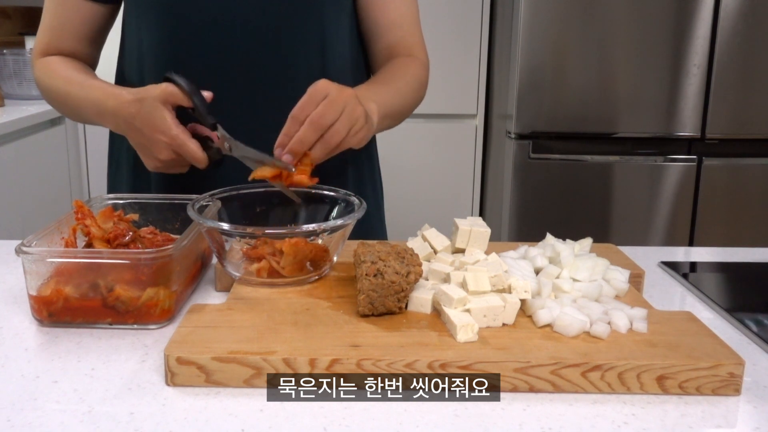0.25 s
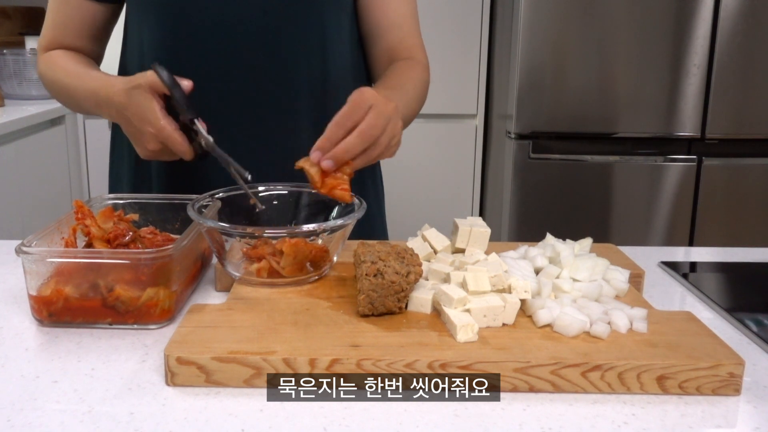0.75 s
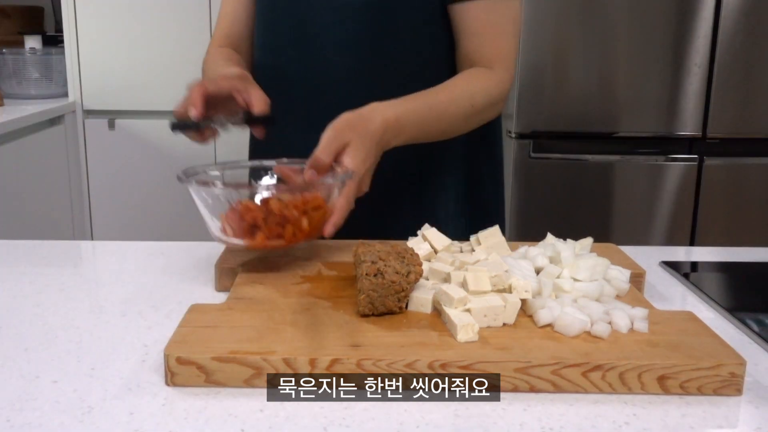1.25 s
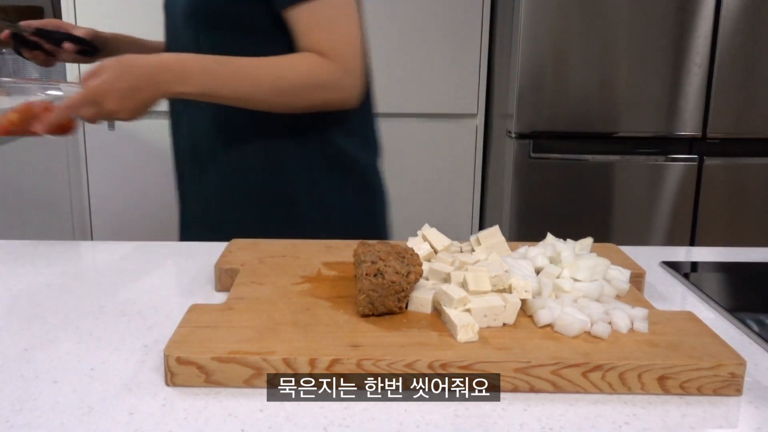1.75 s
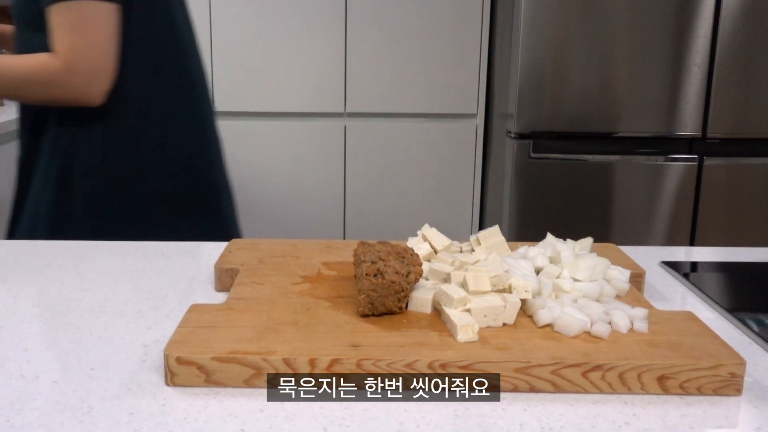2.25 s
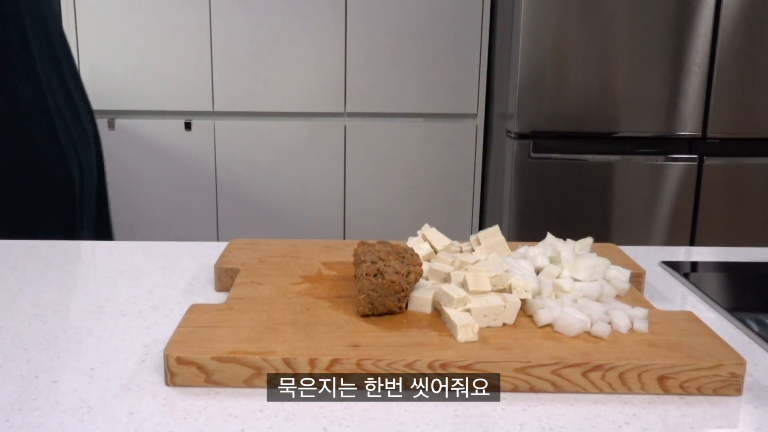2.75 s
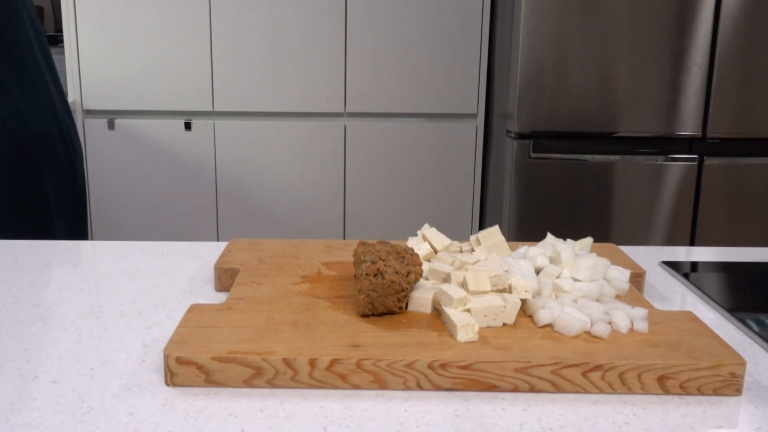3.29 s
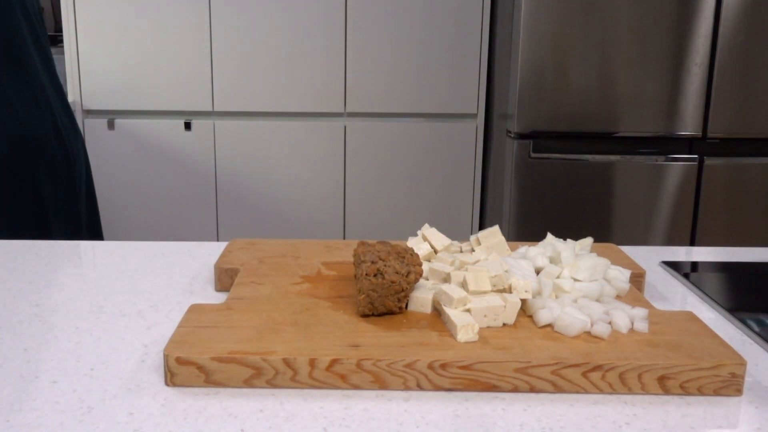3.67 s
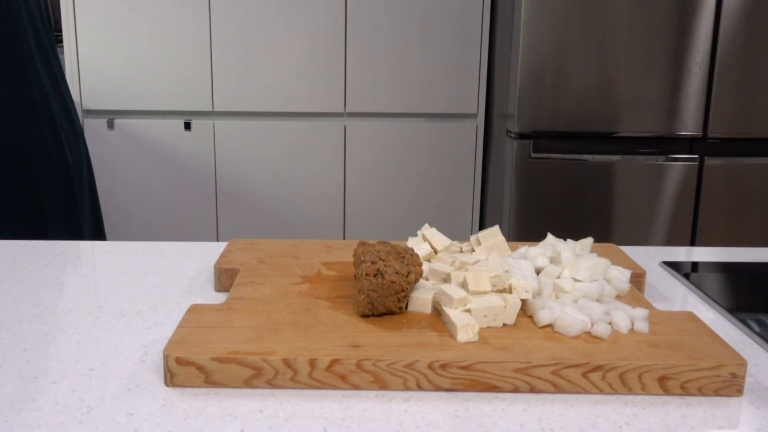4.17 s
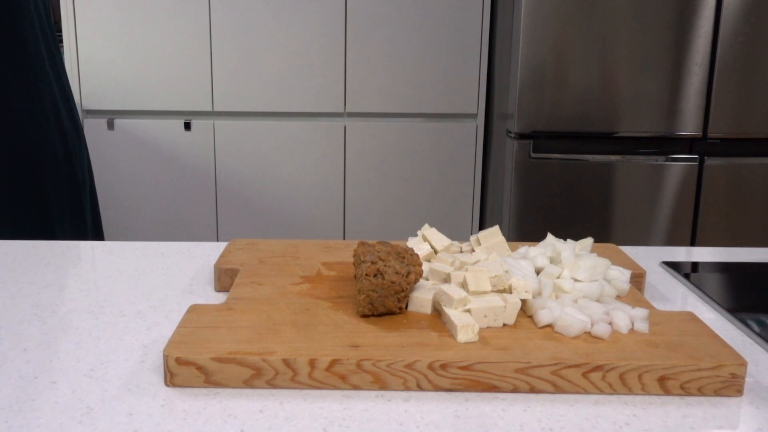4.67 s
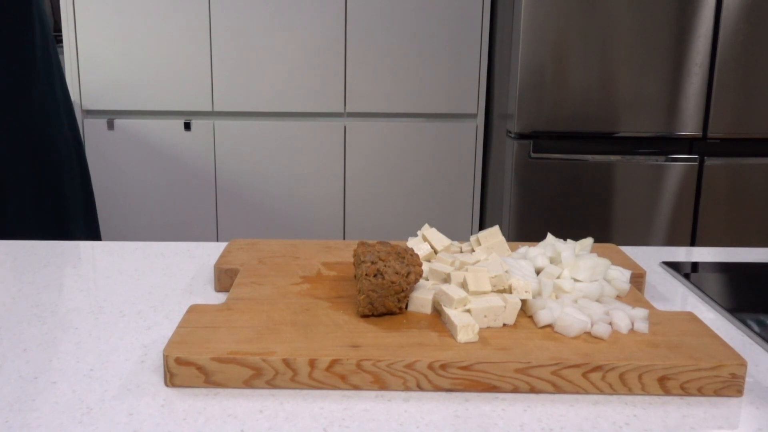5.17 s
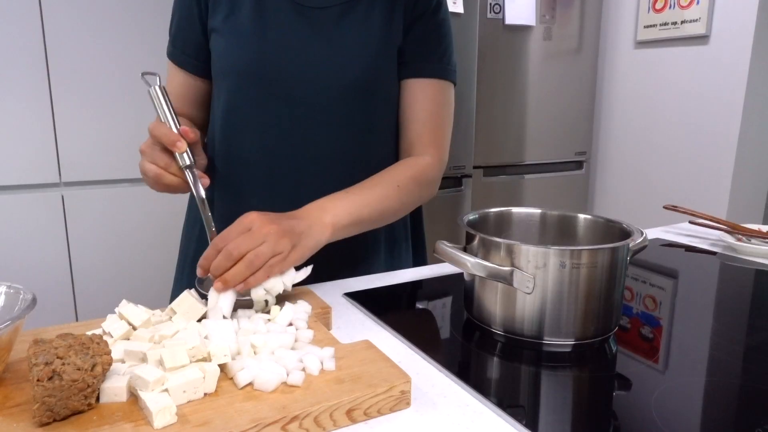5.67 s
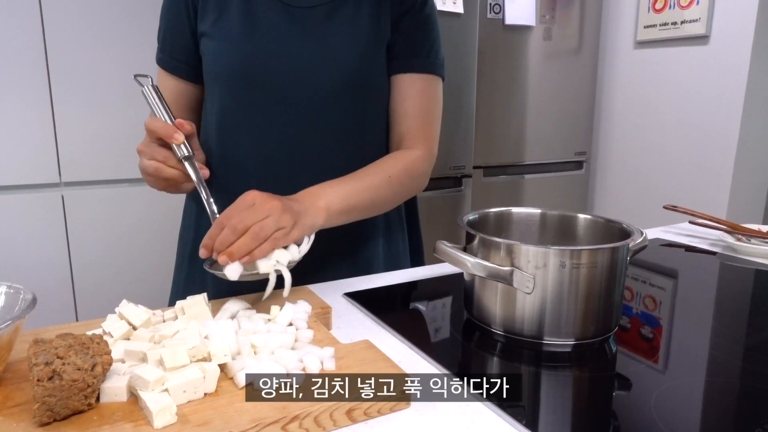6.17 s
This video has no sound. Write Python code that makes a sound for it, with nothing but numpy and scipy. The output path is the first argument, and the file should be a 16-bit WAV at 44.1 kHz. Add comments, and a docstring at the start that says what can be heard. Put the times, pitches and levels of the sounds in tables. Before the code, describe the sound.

A quiet home kitchen, soft airy hiss with faint fuzzy appliance hum and a short room echo. At about 0.36 to 0.5 s scissors crunch through wet pickled cabbage in a cluster of crisp snaps and grainy scrapes; a weaker snip follows at 0.65 s. Room tone shifts at 1.04 s as a glass bowl is lifted with a soft knock, then faint high ringing pips until 1.55 s. Tiny rustles and wet ticks occur near 1.2, 1.9, 2.3 and 2.5 s. At 3.18 s a tap opens with a faint rising whistle, quickly becoming loud gurgling and slapping on a steel sink. Around 4.4 s the bowl takes the stream: brighter, denser spray, splashes, dull thuds, a rising glug at 4.6 s and lower ones near 5.2 s. At 5.37 s the water cuts off abruptly; a small sharp tick, quiet room, and one faint tick at 5.9 s.

```python
"""A home kitchen heard in three parts, each over its own room tone of shaped noise and fuzzy hums.
First, scissors crunch through pickled cabbage: snaps and grainy scrapes, partly through damped blades.
Then a glass bowl is lifted and rings in sines, and hands rustle at the sink in swells of grainy noise.
A tap is opened onto the bowl: rising bubble sines gurgle, then hard spray, slaps, thuds and glugs join.
Last come a few small ticks and the quiet room."""
import sys
import numpy as np
from scipy import signal
from scipy.fft import rfft, irfft, next_fast_len
from scipy.io import wavfile
from scipy.ndimage import uniform_filter1d

SR = 44100
rng = np.random.default_rng(int(sys.argv[2]) if len(sys.argv) > 2 else 0)


def store_wav(level_fs):
    """Save 16-bit WAV to argv[1]."""
    pcm = np.round(np.clip(np.atleast_2d(level_fs), -1, 1) * 32767)
    wavfile.write(sys.argv[1], SR, pcm.T.astype(np.int16))


N = 283990
T = np.arange(N) / SR
LONG = next_fast_len(N + SR // 4)  # padded length for filtering
HZ = np.fft.rfftfreq(LONG, 1 / SR)


def gain_of(db):
    """Turns decibels into a factor."""
    return 10 ** (np.asarray(db) / 20)


def evened(x):
    """Scales to an rms (average strength) of 1."""
    return x / np.sqrt(np.mean(x ** 2) + 1e-30)


def read(points, hz):
    """Reads between the points of a table, on a log-frequency axis."""
    f, value = np.transpose(points)
    return np.interp(np.log(hz + 1), np.log(f + 1), value)


def add(mix, s, sound):
    """Mixes a sound in, starting at s seconds."""
    part = mix[round(s * SR):][:len(sound)]
    part += sound[:len(part)]


def hump(x, hz, octaves):
    """Keeps a bell-shaped band around hz, on a log-frequency axis."""
    f = np.fft.rfftfreq(len(x), 1 / SR) + 1
    bell = np.exp(-.5 * (np.log2(f / hz) / octaves) ** 2)
    return irfft(rfft(x) * bell, len(x))


def modes(table):
    """Response of things that resonate: rows of (f/Hz, width/Hz, level/dB)."""
    return sum(gain_of(db) * 1j * HZ * w / (hz ** 2 - HZ ** 2 + 1j * HZ * w) for hz, w, db in table)


def filtered(x, response):
    """Applies a response given on HZ."""
    return irfft(rfft(x, LONG) * response, LONG)[..., :N]


def low_cut(hz):
    """Response of small sources, which give no bass."""
    return HZ ** 4 / (HZ ** 4 + hz ** 4)


def pair(x, same, balance):
    """Two unrelated signals become left and right with a given likeness and balance."""
    a, b = rfft(x, LONG)
    likeness = np.clip(read(same, HZ), -1, 1)
    lean = gain_of(read(balance, HZ) / 2)
    left = a * lean
    right = (likeness * a + np.sqrt(1 - likeness ** 2) * b) / lean
    return irfft(np.array([left, right]), LONG)[:, :N]


def hiss(patchy_db, flicker_db):
    """Two white noises with drifting patches and a flicker shared by all frequencies."""
    frames = N // 128 + 5
    a, b, c, d, patches = rng.standard_normal((frames, 257, 5)).T
    patches = uniform_filter1d(patches, size=6, axis=0)
    patches = evened(uniform_filter1d(patches, size=16, axis=1))
    flicker = evened(uniform_filter1d(rng.standard_normal(frames), size=3))
    z = np.array([a + 1j * b, c + 1j * d]) * gain_of(patchy_db * patches + flicker_db * flicker)
    return signal.istft(z, nperseg=512, noverlap=384)[1][:, :N]


def bursts(rows, octaves, rise_s):
    """Dying bursts of crackle, from rows of (t/s, level/dB, brightest f/Hz, 60 dB fall time/s)."""
    out, t = np.zeros(N), np.arange(8192) / SR
    for s, db, hz, t60 in rows:
        crackle = evened(hump(rng.standard_normal(len(t)), hz, octaves))
        add(out, s, gain_of(db - 60 * t / t60) * (1 - np.exp(-t / rise_s)) * crackle)
    return out


# the three parts of the sound: (start t/s, end t/s, air noise level/dB)
PARTS = [(-1, 1.034, -59.5), (1.036, 5.371, -64), (5.372, 9, -64)]


def part_on(k, fade_s=.003):
    """1 while part k plays, with a short straight fade at each end."""
    start, end, _ = PARTS[k]
    return np.clip(np.minimum(T - start, end - T) / fade_s, 0, 1)


# colour of the air noise, one list for each part: (f/Hz, relative level/dB per Hz)
TONES = [
    [(35, -68), (60, -40), (216, -20), (370, -6.5), (550, -4.5), (632, -3.5), (897, -4.5), (1010, -9.5),
     (2080, -6.5), (3020, -7), (4090, -12), (11900, -14), (15800, -23.5)],
    [(35, -71), (60, -46), (353, -6.5), (618, -4.5), (817, -3), (1080, -9), (1400, -5.5), (1890, -8),
     (2180, -5), (3900, -11), (8420, -14), (11900, -13), (15800, -17.5)],
    [(47, -64), (80, -38), (145, -13.5), (203, -15), (264, -7), (402, -9), (781, -3), (1360, -7.5),
     (1550, -11.5), (2110, -5), (3430, -10), (14500, -18.5), (15800, -18)],
]
# fuzzy appliance tones: (f/Hz, width/Hz, level/dB in the first, second and third part)
HUMS = [(271, 9, -92, -100, -79), (533, 24, -81, -81, -81.5), (627, 52, -74.5, -80.5, -85),
        (1400, 21, -99, -82.5, -99), (2140, 220, -75, -80.5, -79), (11800, 35, -82, -85, -99),
        (12100, 40, -76, -78, -99), (12400, 100, -77, -79, -99), (14620, 37, -70, -76.5, -90)]
# how alike left and right are: (f/Hz, likeness from -1 to 1)
TONE_SAME = [(60, 0.84), (130, 0.96), (290, 0.92), (640, 0.69), (1410, 0.23), (3100, 0.04), (6820, -0.072),
             (15000, 0.047)]
# how much louder left is than right: (f/Hz, level/dB)
TONE_BALANCE = [(60, -6), (110, 1), (200, 0), (380, 0.5), (700, -1), (1290, 3), (2380, 3.0), (4400, 1.5),
                (8120, 2.5), (15000, 3)]


def room_tone():
    """Each part has its own air noise and appliance tones, shaped from one shared hiss."""
    noise, out = evened(hiss(patchy_db=1.5, flicker_db=0.3)), 0
    hums = np.transpose([evened(abs(modes([(hz, width, 0)])) ** 2) ** 2 for hz, width, *_ in HUMS])
    for k, tone in enumerate(TONES):
        air = gain_of(PARTS[k][2]) * evened(gain_of(read(tone, HZ)))
        hum_levels = gain_of([row[2 + k] for row in HUMS])
        power = air ** 2 + hums @ hum_levels ** 2
        out = out + part_on(k) * filtered(noise, np.sqrt(power))
    return pair(out, TONE_SAME, TONE_BALANCE)


# fibres snapping between the blades:
# (t/s, bright snap relative level/dB, dull crunch relative level/dB, snap 60 dB fall time/s)
SNAPS = [(.3605, -21.5, -35.5, 0.0097), (.363, -21, -51, 0.0065), (.366, -28, -44, .015),
         (.408, -38, -50, .015), (0.4286, -33, -51, 0.017), (.435, -30.5, -43, 0.044),
         (0.4402, -28, -37, 0.013), (.444, -33.5, -44, 0.047), (.468, -31, -38, 0.044),
         (0.475, -30, -31, 0.046), (0.4817, -19.5, -34, 0.015), (.485, -23.5, -22.5, .02),
         (.490, -30, -23.5, 0.015), (.495, -34, -29.5, 0.023), (.507, -52, -31, 0.034),
         (0.653, -42, -42, .04), (.659, -43, -40, .04), (0.668, -46, -45, 0.054), (.69, -51, -58, .05)]
SNAP_HZ, CRUNCH_HZ, CRUNCH_T60_S = 7660, 2600, 0.031
BODY_HZ, BODY_DB = 1130, -11.5  # the low body of each crunch, against the crunch
# each push of the blades scrapes through wet leaf:
# (start t/s, bright relative level/dB, dull relative level/dB)
PUSHES = [(.36, -47.5, -56.5), (0.429, -52, -55.5), (0.471, -48, -53.5), (.652, -56, -61)]
PUSH_RISE_S, PUSH_FALL_DB_PER_S = 0.0056, 125
# what rings in the damped blades: (f/Hz, width/Hz, relative level/dB)
BLADES = [(3050, 390, -3), (5000, 500, -2), (6340, 330, -5), (7600, 340, -16), (9500, 830, -2)]


def scissors():
    """Snapping fibres over a grainy scrape, heard directly and through the damped blades."""
    t = T[:16384]
    snap_rows = [(s, db, SNAP_HZ, t60) for s, db, _, t60 in SNAPS]
    crunch_rows = [(s, db + less_db, hz, CRUNCH_T60_S) for s, _, db, _ in SNAPS
                   for hz, less_db in ((CRUNCH_HZ, 0), (BODY_HZ, BODY_DB))]
    snaps = bursts(snap_rows, octaves=0.56, rise_s=0.00032)
    crunch = bursts(crunch_rows, octaves=0.48, rise_s=0.0004)
    cut = gain_of(-6) * snaps + gain_of(-8.5) * crunch
    push = (1 - np.exp(-t / PUSH_RISE_S)) * gain_of(-PUSH_FALL_DB_PER_S * t)
    for s, *levels in PUSHES:
        grains = rng.standard_normal(len(t)) * gain_of(3.0 * rng.exponential(1, len(t)))
        for db, hz in zip(levels, (8500, 2400)):
            add(cut, s, gain_of(db) * push * evened(hump(grains, hz, 0.75)))
    direct_and_blades = gain_of(-2) + gain_of(-2.5) * modes(BLADES)
    return filtered(cut, direct_and_blades * low_cut(390))


# how long the kitchen's echo takes to fall by 60 dB: (f/Hz, fall time/s)
KITCHEN = [(250, 0.39), (1000, 0.43), (4000, 0.34), (15000, 0.26)]


def kitchen(x):
    """Echo from sparse taps of random sign, each band dying at its own speed, other taps for each side."""
    taps = np.zeros((2, SR // 2))
    at = np.arange(200, SR // 2 - 20, 20)
    at = at + rng.integers(0, 20, (2, len(at)))
    np.put_along_axis(taps, at, rng.choice([-1., 1.], at.shape), 1)
    hz, t, z = signal.stft(taps, SR, nperseg=256)
    fall = gain_of(-60 * t / read(KITCHEN, hz)[:, None])
    tail = signal.istft(z * fall, SR, nperseg=256)[1]
    return signal.fftconvolve(x[None], tail / np.linalg.norm(tail[0]), axes=1)[:, :N]


BOWL_S = 1.045  # moment of the knock
# quickly damped tones of the knocked glass: (f/Hz, level/dB, 60 dB fall time/s)
BOWL = [(1180, -49, .06), (1080, -56, .05), (2400, -63, .09)]
# the glass rings on in short soft pips as the bowl is carried:
# (middle t/s, level/dB, f/Hz, half length/s)
PIPS = [(1.068, -64, 1415, 0.011), (1.128, -62, 1395, 0.018), (1.178, -60, 1418, 0.01),
        (1.248, -62, 1392, 0.021), (1.342, -68, 1408, 0.01), (1.382, -66.5, 1402, 0.01),
        (1.493, -68, 1408, 0.011), (1.544, -71, 1412, 0.016)]


def bowl():
    """The glass is knocked as it is lifted, and goes on ringing in soft sine pips."""
    t = np.maximum(T - BOWL_S, 0)
    ring = sum(gain_of(db) * np.exp(-.5 * ((T - s) / half) ** 2) * np.sin(2 * np.pi * hz * t)
               for s, db, hz, half in PIPS)
    knock = sum(gain_of(db - 60 * t / t60) * np.sin(2 * np.pi * hz * t) for hz, db, t60 in BOWL)
    return (ring + knock) * (1 - np.exp(-t / 0.0027))


# small rustles and wet ticks:
# (middle t/s, relative level/dB, rise/s, fall/s, brightest f/Hz, width/octaves)
RUSTLES = [(1.217, -59, 0.0036, .01, 9000, 3), (1.226, -54, .001, .003, 11000, 1.5),
           (1.23, -61, 0.012, 0.035, 7000, 3.2), (1.885, -65.5, 0.0027, .008, 2500, 0.45),
           (2.26, -63.5, 0.018, .03, 9000, 1.1), (2.298, -53.5, 0.017, 0.029, 8000, 1.2),
           (2.48, -59, 0.023, 0.028, 8000, 1.8), (5.376, -55, .002, .004, 3500, 0.65),
           (5.384, -48, 0.0011, .0015, 10000, 1.3), (5.92, -64, .002, .006, 1900, 0.55)]


def rustles():
    """Grainy noise that swells and dies away."""
    out, t = np.zeros(N), np.arange(-4096, 8192) / SR
    for s, db, rise, fall, hz, octaves in RUSTLES:
        grains = rng.standard_normal(len(t)) * gain_of(3.4 * rng.exponential(1, len(t)))
        swell = np.where(t < 0, np.exp(-.5 * (t / rise) ** 2), np.exp(-np.abs(t) / fall))
        add(out, s + t[0], gain_of(db) * swell * evened(hump(grains, hz, octaves)))
    return out


# bubble sizes:
# (f/Hz, relative level/dB on the steel, relative level/dB in the bowl, share of the large-bubble level)
BUBBLES = [(237, -45, -39.5, .05), (660, -7.5, 4.5, 1.67), (1234, 0, 1, 1.01), (2280, 2.5, 2, 0.49),
           (4370, 0, 0, 0.027)]
CLUMP_S, CLUMP_DB = 0.056, 1.13  # bubbles of one size come in clumps


def bubbles(t, small_db, large_db, shielded, low_hz, high_hz, per_cycle, cycles, spread_db):
    """Air pockets: short rising sines at random moments in two unrelated swarms, levels set by pitch."""
    out = np.zeros((2, len(t)))
    pitch, *columns = np.transpose(BUBBLES)
    for hz in np.geomspace(low_hz, high_hz, num=36):
        u = np.arange(0, 3 * cycles / hz, 1 / SR) * hz / cycles
        envelope = np.exp(-2.5 * u) * (1 - np.exp(-(3.94 * u) ** 2))
        ping = np.sin(2 * np.pi * cycles * u * (1 + .05 * u)) * envelope
        # small bubbles are the more frequent
        chance = rng.random((2, len(t))) * SR / (per_cycle * hz)
        size = (chance < 1) * gain_of(-spread_db * np.log(np.clip(chance, .02, 1)))
        swarm = evened(signal.oaconvolve(size, ping[None])[:, :len(t)])
        steel_db, bowl_db, share = (np.interp(np.log(hz), np.log(pitch), v) for v in columns)
        clumps = evened(uniform_filter1d(rng.standard_normal(len(t)), size=round(CLUMP_S * SR)))
        db = steel_db + (bowl_db - steel_db) * shielded + CLUMP_DB * clumps
        out += swarm * gain_of(small_db + db + share * large_db)
    return out


RUNNING = slice(round(3.17 * SR), round(5.38 * SR))
SHIELDED_S = 4.36  # the bowl takes the stream off the steel
# the tap over time:
# (t/s, small-bubble relative level/dB, large-bubble level/dB against the small ones)
TAP = [(3.17, -79, 7), (3.185, -67.5, 10), (3.25, -53.5, -11), (3.33, -49.5, -11.5), (3.36, -41, -16.5),
       (3.41, -46.5, -10.5), (3.5, -43, -15), (3.6, -44.5, -13.5), (3.74, -47.5, -2), (3.79, -48.5, -1.5),
       (3.84, -41.5, -10), (3.93, -42.5, -8), (4.06, -42, -8), (4.15, -40.5, -12), (4.3, -41, -16.5),
       (4.355, -47, -12), (4.385, -41.5, -14), (4.43, -37, -16.5), (4.55, -41.5, -17.5),
       (4.645, -38, -15.5), (4.74, -40.5, -18), (4.92, -40, -18), (5.298, -40.5, -19), (5.37, -42, -22.5)]
# colour of the fine spray: (f/Hz, relative level/dB per Hz)
SPRAY = [(3240, -32), (5500, -3), (8730, -0.5), (9460, -1), (11500, -1.5), (12700, -0.5), (15900, -4)]
SPRAY_DB, SPRAY_SHIELDED_DB = 5.5, 9.5  # against small_db, before and after the bowl is under the stream
# what rings in the steel sink under the stream: (f/Hz, width/Hz, relative level/dB)
SINK = [(636, 73, 3.5), (863, 19, 6.5), (1138, 31, 11), (1316, 19, 5.5), (1850, 58, 1.5), (2140, 96, -0.5),
        (2517, 11, 0), (2795, 25, 3), (2920, 24, 9.5), (3594, 71, 2), (4040, 37, 0), (4700, 40, 4)]
# how alike left and right are: (f/Hz, likeness from -1 to 1)
TAP_SAME = [(60, 0.79), (130, 0.99), (290, 1), (640, 0.82), (1410, 0.81), (3100, 0.59), (6820, -0.25),
            (15000, -0.23)]
# how much louder left is than right: (f/Hz, level/dB)
TAP_BALANCE = [(60, 0.0), (110, 4), (200, -3), (380, 1.5), (700, 2.5), (1290, 4), (2380, 2.5), (4400, 2.5),
               (8120, 3), (15000, 1)]


def tap():
    """Fine spray over bubbles of all sizes, which also shake the sink."""
    s, *levels = np.transpose(TAP)
    t = T[RUNNING]
    small_db, large_db = (np.interp(t, s, db) for db in levels)
    shielded = np.clip((T - SHIELDED_S) / 0.09, 0, 1)
    spray = evened(filtered(hiss(patchy_db=2.0, flicker_db=1.0), gain_of(read(SPRAY, HZ))))
    spray = spray * gain_of(SPRAY_DB + (SPRAY_SHIELDED_DB - SPRAY_DB) * shielded)
    froth, mist = np.zeros((2, 2, N))
    mist[:, RUNNING] = gain_of(small_db) * spray[:, RUNNING]
    swarms = bubbles(t, small_db, large_db, shielded[RUNNING], low_hz=190.6, high_hz=6125,
                     per_cycle=.14, cycles=12.5, spread_db=2.5)
    froth[:, RUNNING] = gain_of(-11.0) * swarms
    struck = froth * gain_of(-12 * shielded)  # the bowl keeps the bubbles from shaking the steel
    basin = 1 + modes([(4050, 2300, -3)])  # the hollow basin favours the small bubbles
    water = mist + filtered(froth, basin) + filtered(struck, modes(SINK))
    return pair(filtered(water, low_cut(205)), TAP_SAME, TAP_BALANCE)


# slaps of water on glass and steel: (t/s, relative level/dB, brightest f/Hz)
SLAPS = [(3.1785, -45, 1190), (3.2184, -44, 3760), (3.3495, -28.5, 2160), (3.5064, -26.5, 3600),
         (3.5938, -26, 2950), (3.7114, -25.5, 3000), (3.8035, -27, 1160), (3.8234, -27, 3990),
         (3.8964, -26.5, 1310), (4.1444, -22, 4070), (4.3765, -23.5, 5000), (4.3979, -21.5, 5600),
         (4.4263, -19.5, 3620), (4.587, -19.5, 4070), (4.6304, -18.5, 4270), (4.6884, -25, 4660),
         (4.8844, -21.5, 4600), (4.9922, -27, 4220), (5.1484, -22, 7880), (5.3104, -27, 7990),
         (5.3524, -29, 2970)]
SLAP_T60_S = 0.06


def slaps():
    """Water slapping on glass and steel: quick narrow bursts of noise."""
    rows = [(*row, SLAP_T60_S) for row in SLAPS]
    return gain_of(-10.5) * filtered(bursts(rows, octaves=0.21, rise_s=.001), low_cut(500))


FILL_S, FILL_LENGTH_S, FILL_FUZZ_S = 3.18, .17, 0.01
FILL_HZ, FILL_OCTAVES, FILL_DB = 1087, 1.3, -64  # starting pitch, rise, level


def spout():
    """The spout fills with water and its air whistles upward, fuzzily."""
    out, u = np.zeros(N), np.arange(0, 1, 1 / (FILL_LENGTH_S * SR))
    fuzz = uniform_filter1d(rng.standard_normal((2, len(u))), size=round(FILL_FUZZ_S * SR))
    turn = 2 * np.pi * np.cumsum(FILL_HZ * 2 ** (FILL_OCTAVES * u)) / SR
    whistle = evened(fuzz[0] * np.cos(turn) + fuzz[1] * np.sin(turn))
    add(out, FILL_S, gain_of(FILL_DB) * np.sin(np.pi * u) * whistle)
    return filtered(out, low_cut(700))


def soft_start(t):
    """A smooth rise over a few milliseconds."""
    return 1 - np.exp(-(t / 0.004) ** 2)


# glugs of trapped air: (t/s, level/dB, starting f/Hz)
GLUGS = [(4.405, -59, 395), (4.627, -36, 1090), (5.218, -43, 404), (5.263, -51, 382), (5.32, -59, 357)]
GLUG_CYCLES, GLUG_RISE_PER_S = 52, 1.7  # cycles to fall by 60 dB, relative rise of pitch


def glugs():
    """Trapped air sings as a dying sine whose pitch rises."""
    out, t = np.zeros(N), np.arange(SR // 2) / SR
    for s, db, hz in GLUGS:
        turns = hz * t * (1 + GLUG_RISE_PER_S * t / 2)
        fall = gain_of(db - 60 * turns / GLUG_CYCLES)
        add(out, s, fall * soft_start(t) * np.sin(2 * np.pi * turns))
    return out


# dull thuds of the bowl in the sink; the last row is a brief low click: # (t/s, ring level/dB, rumble level/dB,
# rumble 60 dB fall time/s)
THUDS = [(4.415, -78, -63.5, 0.72), (4.64, -60, -57, 0.37), (5.185, -68, -58, 0.85), (5.24, -63, -61, 0.45),
         (5.362, -62, -64, .05)]
# what rings in each thud: (f/Hz, level/dB against the ring level, 60 dB fall time/s)
THUD_MODES = [(78, -14, .15), (146, -1.5, .28), (222, 1, 0.14)]
RUMBLE_HZ = 447


def thuds():
    """Low damped sines with a soft start, over a rumble of noise."""
    t = np.arange(SR // 2) / SR
    rumble_rows = [(s, db, RUMBLE_HZ, t60) for s, _, db, t60 in THUDS]
    out = bursts(rumble_rows, octaves=0.62, rise_s=0.0041)
    ring = sum(gain_of(db - 60 * t / t60) * np.sin(2 * np.pi * hz * t) for hz, db, t60 in THUD_MODES)
    for s, db, *_ in THUDS:
        add(out, s, gain_of(db) * soft_start(t) * ring)
    return out


def scene():
    """Places the sounds left to right, adds the kitchen's echo, and ends sink sounds and echo with their part."""
    cut, small, slap = scissors(), rustles(), slaps()
    echoes = kitchen(gain_of(-7.5) * cut + gain_of(-0.5) * small + gain_of(-13) * slap)
    # left and right gains in dB: these sounds lean a little left
    sinkside = (slap + bowl() + spout()) * gain_of([[1.5], [-1.5]])
    direct = cut * gain_of([[1.6], [-1.6]]) + small * gain_of([[1.1], [-1.1]])
    rinsing = sinkside + thuds() + glugs() + tap()
    return direct + part_on(1) * rinsing + (part_on(0) + part_on(1)) * echoes + room_tone()


EDGE_HZ = 15880


def record(dry):
    """Cuts off everything above the band edge with a steep filter."""
    band = signal.firwin(1023, EDGE_HZ, window=("kaiser", 10), fs=SR)
    return signal.oaconvolve(dry, band[None], "same")


dry = scene()
out = record(dry)
store_wav(out)
```